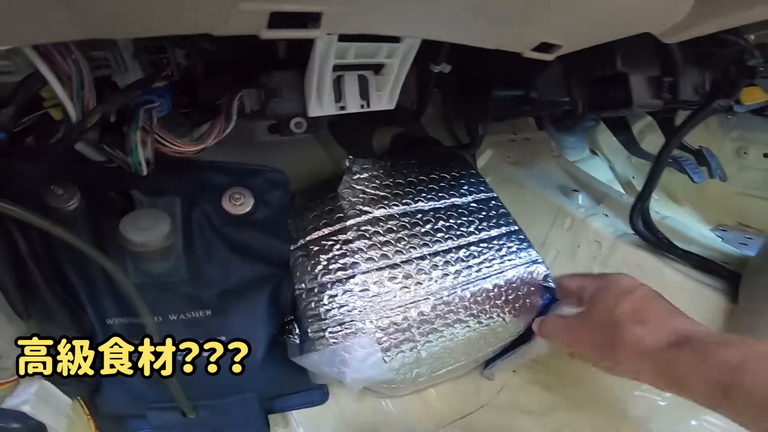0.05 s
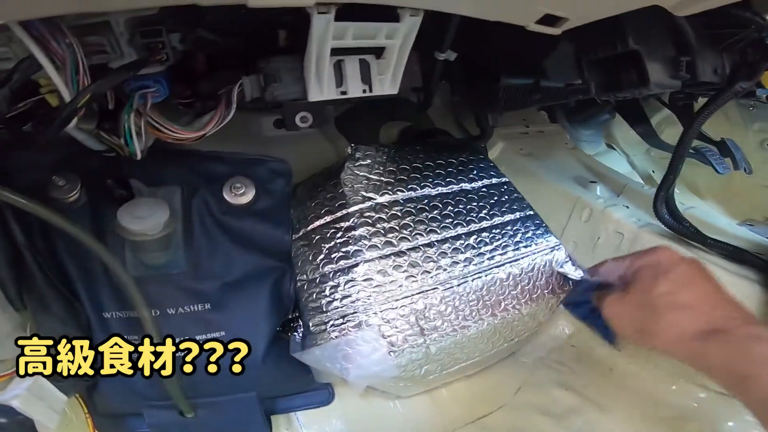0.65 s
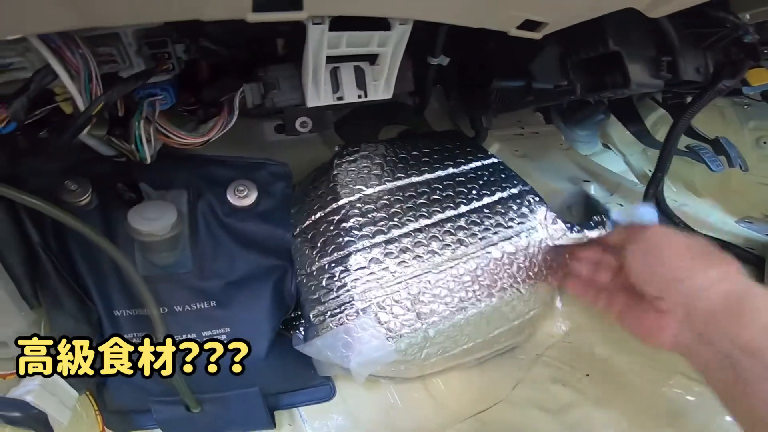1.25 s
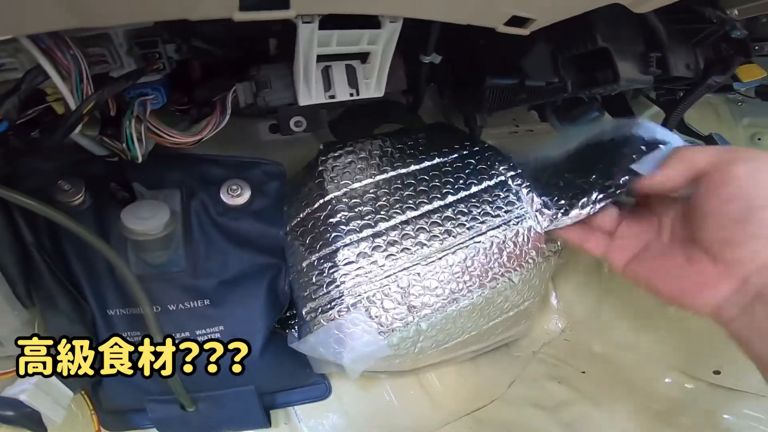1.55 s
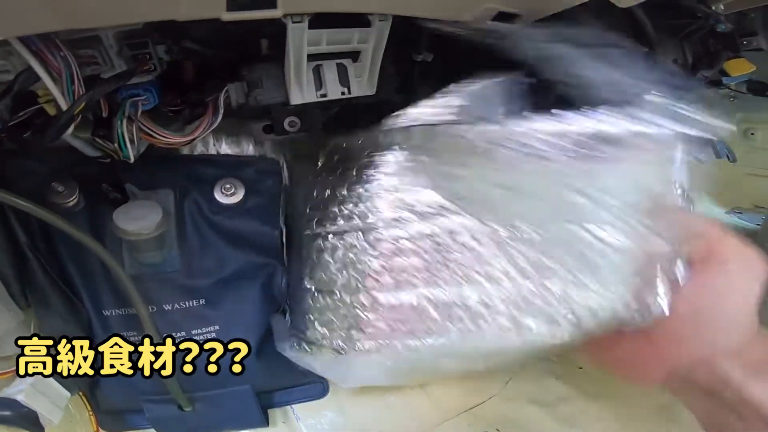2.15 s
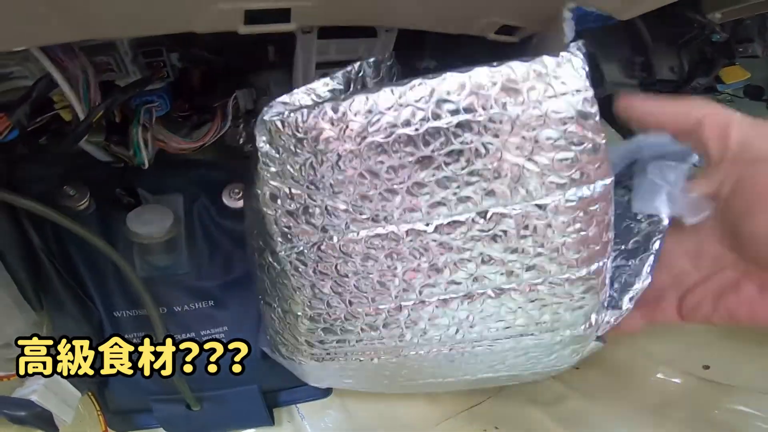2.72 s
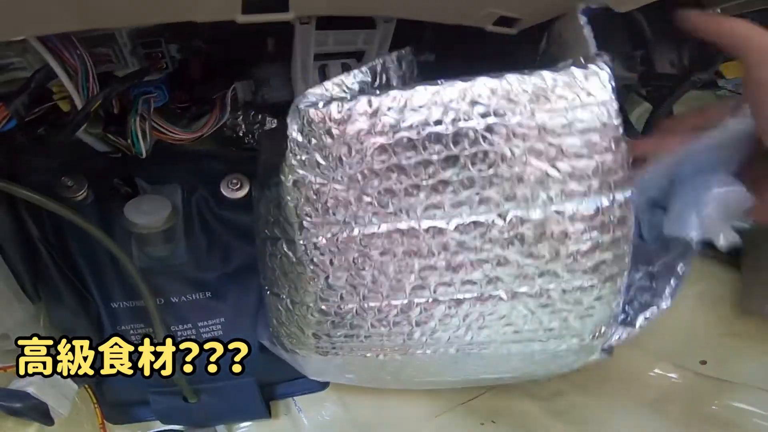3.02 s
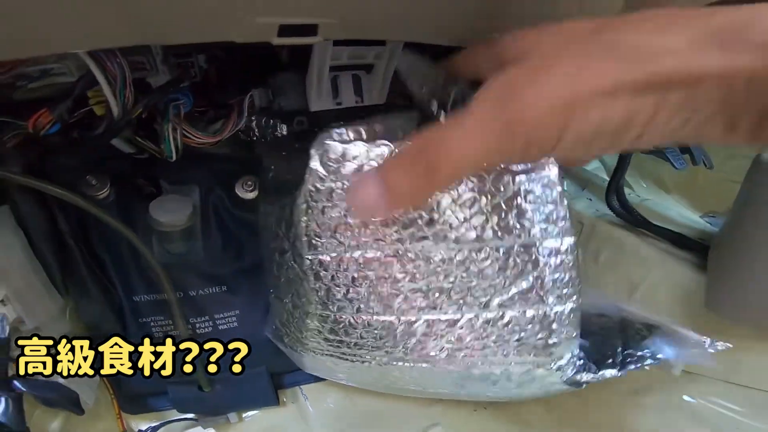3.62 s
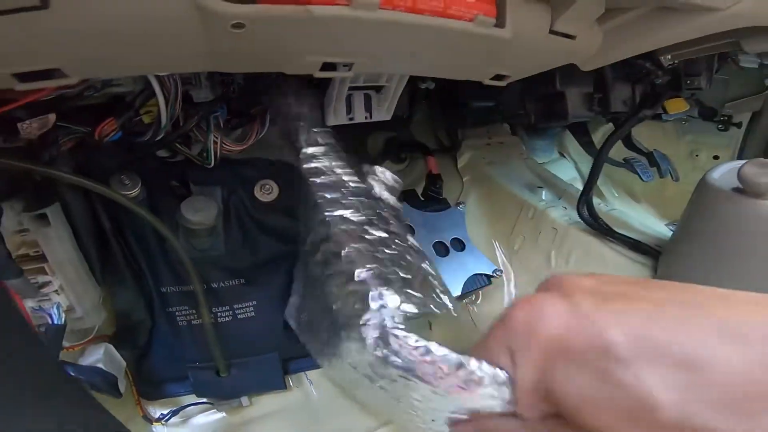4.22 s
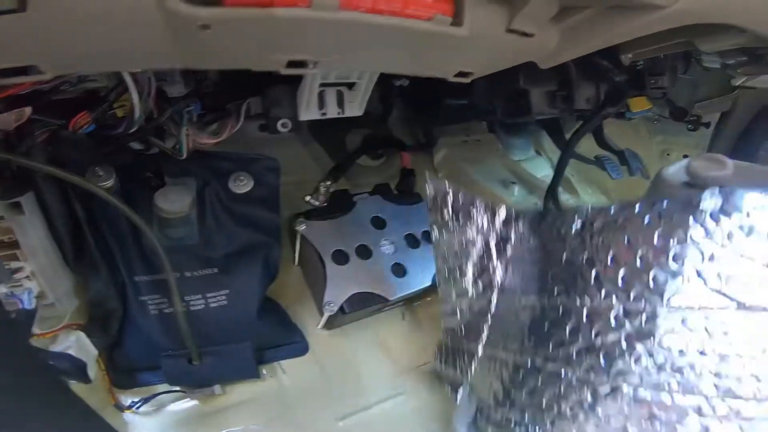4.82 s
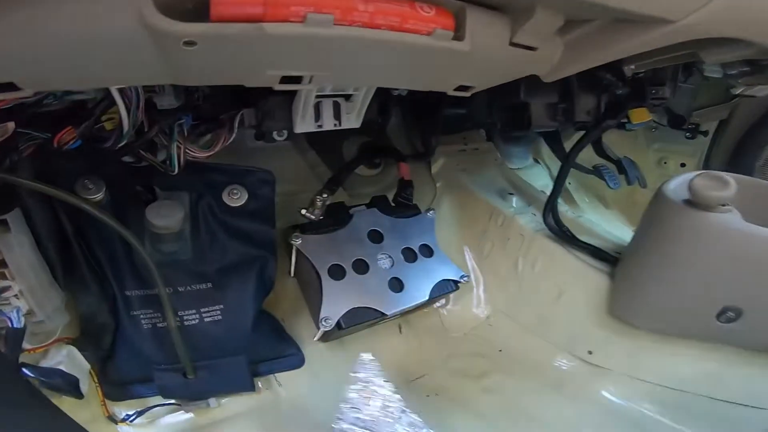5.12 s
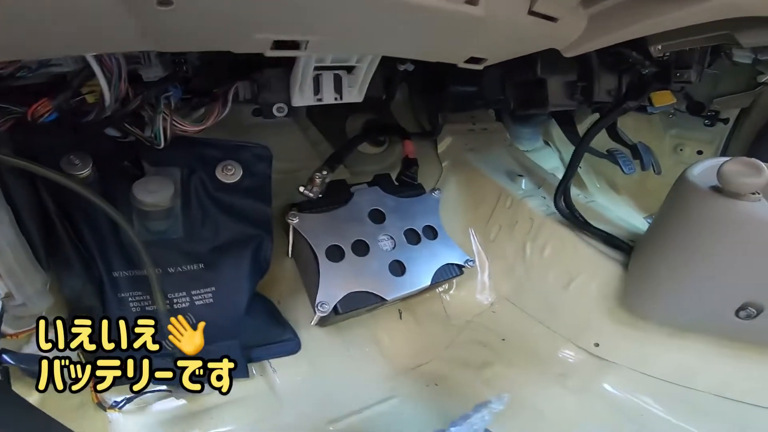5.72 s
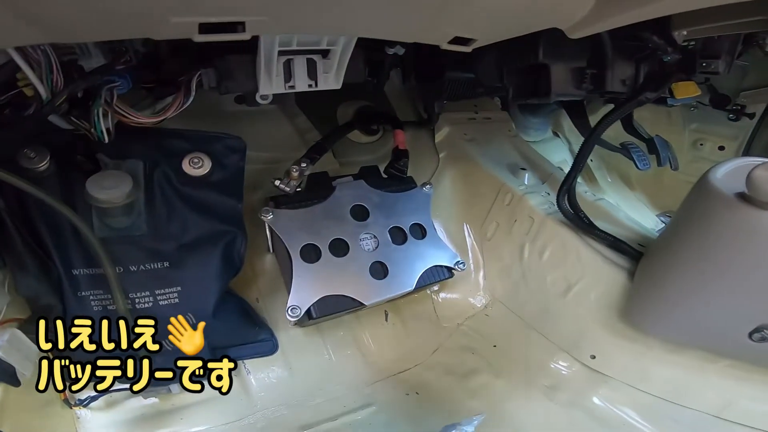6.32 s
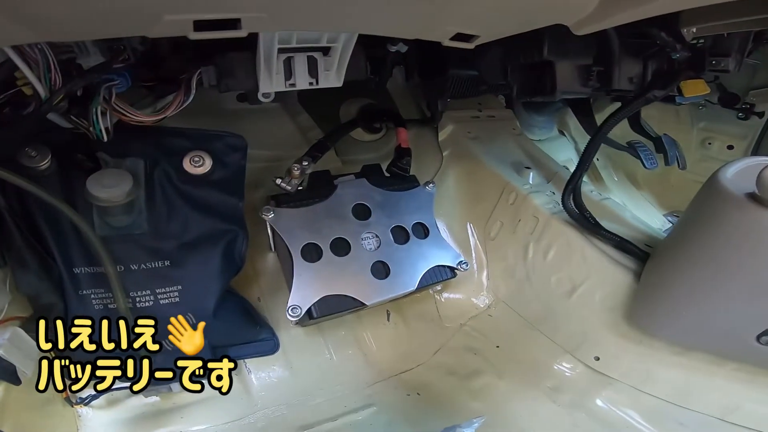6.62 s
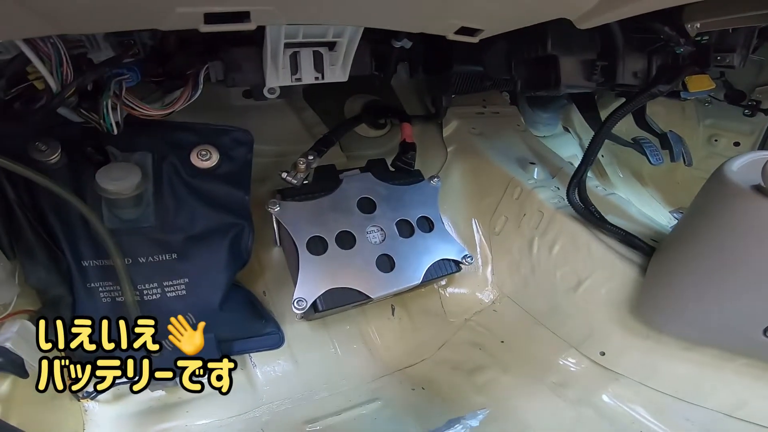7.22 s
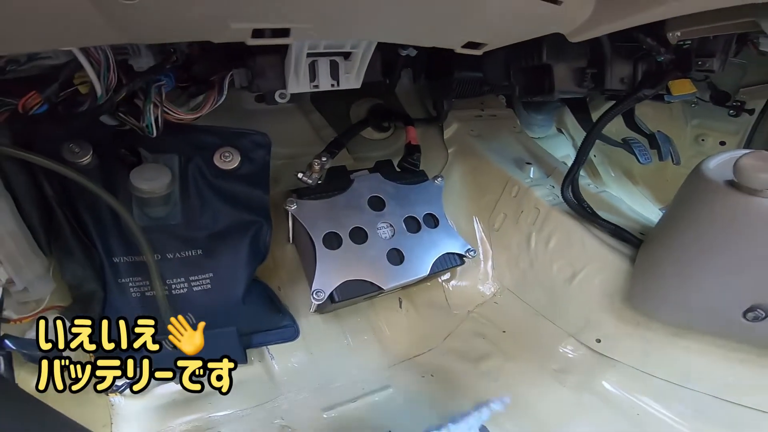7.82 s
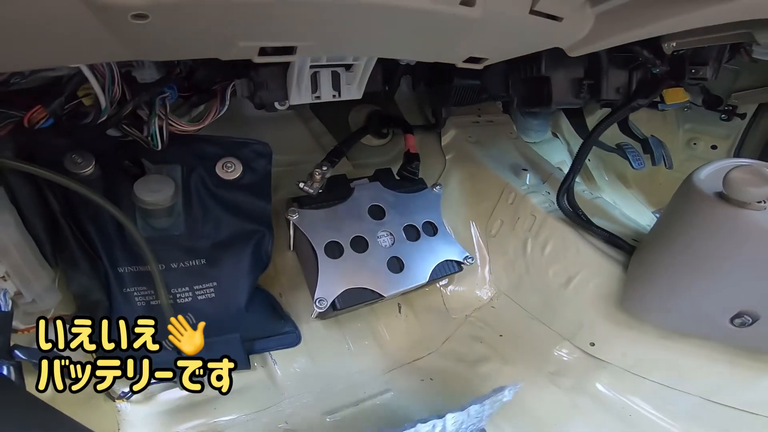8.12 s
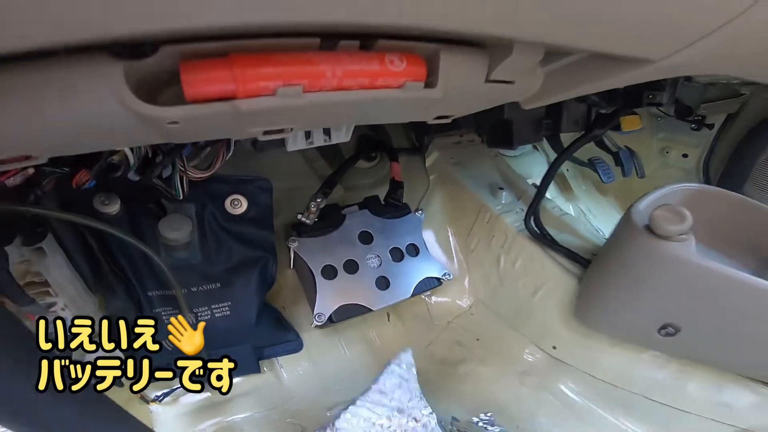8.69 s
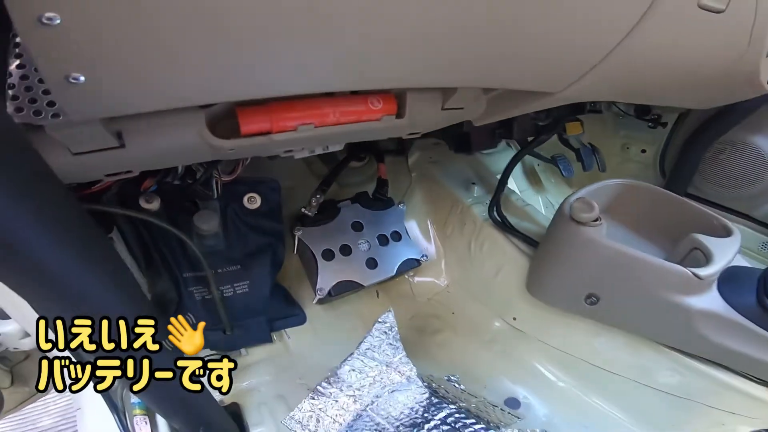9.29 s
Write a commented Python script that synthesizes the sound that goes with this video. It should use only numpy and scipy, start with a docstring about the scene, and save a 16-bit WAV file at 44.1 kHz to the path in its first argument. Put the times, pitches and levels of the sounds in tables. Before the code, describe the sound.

Close to the microphone in a small, damped car cabin, a sheet of foil bubble insulation crackles in uneven tugs for about six seconds. Larger creases pop and the flexing sheet gives low flaps and boxy thumps. It goes almost quiet as the sheet rests, then one more crinkling slide follows. Just before the end, a faint low engine idle comes in, slightly to the right.

```python
"""A car footwell, heard close up in stereo in the small, damped cabin.
Hands pull out a foil-faced bubble sheet, drag it aside, rest, and shift it again.
Countless tiny creases crackle, larger facets snap through, and the flexing sheet pushes the
cabin air and thuds as it buckles. Near the end an engine idles faintly in the background."""
import sys
import numpy as np
from scipy import signal
from scipy.fft import rfft, irfft, next_fast_len
from scipy.io import wavfile

SR = 44100
rng = np.random.default_rng(int(sys.argv[2]) if len(sys.argv) > 2 else 0)


def to_wav(sig):
    """Store sig (one row per channel, or 1-D mono) as 16-bit WAV at the path in sys.argv[1].

    Samples outside -1..1 are clipped; the rate is SR.
    """
    pcm = np.clip(np.atleast_2d(sig), -1, 1) * 32767
    pcm = np.round(pcm).astype(np.int16)
    wavfile.write(sys.argv[1], SR, pcm.T)  # frames by channels


N = 412335
T = np.arange(N) / SR
FFT_SIZE = next_fast_len(N)
BIN_HZ = np.maximum(np.arange(FFT_SIZE // 2 + 1) * SR / FFT_SIZE, 1)


def undb(db):
    """Decibels to gain."""
    return 10 ** (np.asarray(db) / 20)


def unit(x):
    """Scale to rms 1."""
    return x / np.sqrt(np.mean(x ** 2))


def decay(t, t60_s):
    """A fade that loses 60 dB in t60_s."""
    return np.exp(-np.log(1000) * t / t60_s)


def shaped(x, spectrum):
    """Colour x with rows of f/Hz, level/dB, at rms 1; nothing passes far above the last row."""
    hz, db = np.transpose(spectrum)
    gain = undb(np.interp(np.log(BIN_HZ), np.log(hz), db))
    gain /= 1 + (BIN_HZ / (2 * hz[-1])) ** 10
    return unit(irfft(rfft(x, FFT_SIZE) * gain, FFT_SIZE)[..., :N])


def panned(db):
    """Left and right gains of constant power; pan is left minus right in dB."""
    gains = undb(np.array([db, -db]) / 2)
    return gains / np.sqrt(np.mean(gains ** 2, axis=0))


def widen(mid, side, side_db):
    """Left and right from a mid and a side signal."""
    width = undb(side_db)
    return np.array([mid + width * side, mid - width * side]) / np.sqrt(1 + width ** 2)


def stereo_noise(side_db):
    """White noise, partly shared by left and right."""
    return widen(*rng.standard_normal((2, N)), side_db)


def wander(per_s):
    """A smooth random curve with a spread near 1."""
    steps = rng.standard_normal(4096)
    return np.interp(T * per_s, np.arange(len(steps)), steps)


# the idle coming in: t/s, level/dB
IDLE_LEVEL = [(8.82, -58), (8.92, -40), (9.0, -38.5), (9.08, -38.5), (9.35, -39)]
# engine hum: multiple of the firing rate, level/dB
FIRING_HARMONICS = [(1, -17), (2, -3.5), (3, -8.5), (4, -2), (5, -15), (6, -11.5), (8, -15.5), (9, -24.5),
                    (10, -14)]
# spectrum of the mechanical noise: f/Hz, level/dB
ENGINE_SPECTRUM = [(25, -4), (60, -1.5), (88, 8.5), (120, -3), (250, -8), (500, -11), (1000, -17.5),
                   (2500, -25), (5000, -32.5), (7000, -46), (9500, -78)]
def engine(firing_hz=38.54, waver=0.01, hum_db=-5, noise_db=-1.0, pan_db=-3.0):
    """In the background, a little to the right: unsteady firing harmonics over dull mechanical noise."""
    phase = 2 * np.pi * np.cumsum(firing_hz * (1 + waver * wander(23))) / SR
    hum = unit(sum(undb(db) * np.sin(k * phase + 2 * np.pi * rng.random())
                   for k, db in FIRING_HARMONICS))
    noise = shaped(stereo_noise(side_db=-1.0), ENGINE_SPECTRUM)
    level = undb(np.interp(T, *np.transpose(IDLE_LEVEL), left=-140))
    return level * (undb(hum_db) * hum + undb(noise_db) * noise) * panned(pan_db)[:, None]


def cabin(x, t60_s=0.043, wet_db=-15, gap_s=0.011):
    """Trim and carpet close to the microphone return a short, dense tail, different on each side."""
    t = np.arange(SR // 5) / SR
    tail = rng.standard_normal((2, len(t))) * decay(t, t60_s) * (t > gap_s)
    tail /= np.sqrt(np.sum(tail ** 2, axis=1, keepdims=True))
    return x + undb(wet_db) * signal.fftconvolve(x, tail, axes=1)[:, :N]


# faint brushes while the sheet rests: middle t/s, level/dB, half-length/s
SOFT_TOUCHES = [(6.064, -63, 0.037), (6.261, -63.5, .045), (6.38, -73, .072), (6.585, -58.5, .029),
                (6.687, -79, .064), (6.9, -71, .011), (7.149, -67.5, .027), (8.8, -53, 0.028),
                (8.903, -56.5, .04)]
def brushes(low_db=-1.5, bright_db=-3.5):
    """Soft touches come, hold briefly and stop."""
    touch = sum(undb(db) * np.exp(-((T - middle) / half_s) ** 4) for middle, db, half_s in SOFT_TOUCHES)
    power = (touch + 1e-9) ** 2
    return power, power * undb(low_db) ** 2, power * bright_db


# three moves (working loose, dragging aside, shifting again), each a list of: t/s, level/dB, pan/dB
SHEET_MOVES = [
    [(0, -41.5, -2), (.17, -47, -0.5), (.3, -50, -2), (.38, -42.5, -3), (.85, -37.5, -3), (1.25, -43, -2.5),
     (1.5, -36.5, -2), (1.85, -38, -1.5), (2.32, -33.5, -0.5), (2.45, -35.5, -3), (2.775, -38, 0.5)],
    [(2.79, -60.5, -1), (2.95, -42.5, -2), (3.15, -43, -1), (3.35, -40, -0.5), (3.62, -37, -1),
     (3.95, -33.5, -0.5), (4.4, -38.5, 0.5), (4.75, -41, -4), (5.73, -41, -4.5), (5.87, -49.5, -2),
     (6.01, -51, -2)],
    [(7.37, -53, -1), (7.43, -47.5, -1), (7.62, -48, -1), (7.77, -51.5, 0), (7.83, -42.5, -4.5),
     (8.0, -40.5, -3), (8.2, -33, -4), (8.45, -38, -4), (8.705, -44, -2)],
]
def sliding(reference_db=-42, flex_db=(-42, -42.5, -45.5), flex_slope=0.78, stop_db_per_s=850):
    """Each move rustles and flexes the sheet, least once it lies free; both stop with the hand."""
    rustle, low = 0, 0
    for move, move_flex_db in zip(SHEET_MOVES, flex_db):
        times, db, _ = np.transpose(move)
        level_db = np.interp(T, times, db)
        outside_s = np.abs(T - np.clip(T, times[0], times[-1]))
        moving = undb(-stop_db_per_s * np.minimum(outside_s, .5))
        rustle += (moving * undb(level_db)) ** 2
        low += (moving * undb(move_flex_db + flex_slope * (level_db - reference_db))) ** 2
    # faster sliding is brighter
    bright_db = -0.5 + 0.16 * np.clip(10 * np.log10(rustle) - reference_db, -10, 10)
    return rustle, low, rustle * bright_db


# pulls on the sheet: t/s, rise/s, length/s, crackle level/dB, flexing level/dB, brightness/dB
HAND_TUGS = [(0.007, .008, 0.02, -32, -50, -0.5), (0.215, .005, 0.0086, -30.5, -52, -4.5),
             (0.405, .012, 0.04, -29.5, -35.5, -1), (0.461, .008, 0.033, -29, -42, -3.5),
             (0.567, .03, 0.12, -34.5, -61, 1), (0.666, .015, .035, -29.5, -54, 0),
             (0.78, .005, 0.035, -40, -39, -2), (0.905, .008, .025, -36.5, -29.5, -2),
             (0.954, .008, .05, -29.5, -25.5, -5.5), (1.118, .005, 0.049, -36.5, -37, -6),
             (1.335, .02, 0.1, -34.5, -39, -2.5), (1.408, .022, 0.062, -25.5, -27.5, -5.5),
             (1.473, .01, 0.07, -33.5, -38, 0), (1.529, .02, 0.049, -26, -29, 3),
             (1.606, .015, 0.049, -36, -45, 5), (1.862, .06, 0.085, -27.5, -40, 2.5),
             (1.936, .025, 0.059, -23.5, -19.5, 1), (2.011, .01, 0.05, -27.5, -23, -1.5),
             (2.079, .01, 0.22, -30, -27.5, -2.5), (2.148, .005, 0.042, -29, -22.5, -2),
             (2.571, .005, 0.13, -32, -30, -2), (2.666, .015, 0.044, -23.5, -26.5, -4),
             (2.718, .008, 0.049, -36, -29.5, 6.5), (2.942, .03, 0.12, -34, -38.5, 3),
             (3.185, .08, 0.17, -33, -29, 0), (3.49, .03, 0.056, -37.5, -42, 4),
             (3.674, .04, 0.083, -35.5, -35, 3), (3.786, .005, 0.037, -32, -30, 3.5),
             (3.992, .025, 0.065, -28, -31, 4.5), (4.105, .006, .09, -35.5, -39, 4),
             (4.187, .03, 0.053, -29, -41, 4.5), (4.253, .004, 0.013, -31.5, -27, -3),
             (4.294, .005, 0.021, -23.5, -20, -8), (4.491, .045, 0.092, -24, -23, -6.5),
             (4.636, .01, 0.052, -35.5, -40, 11.5), (4.758, .01, 0.17, -43, -52, 4.5),
             (4.933, .025, 0.1, -37, -41.5, 5), (5.033, .012, 0.055, -27, -33.5, 0.5),
             (5.097, .005, 0.048, -32.5, -25, 0.5), (5.168, .004, .07, -30.5, -34.5, -1),
             (5.248, .01, .11, -35, -39, -0.5), (5.363, .005, 0.067, -28, -31, -3.5),
             (5.618, .006, .065, -32.5, -44, 2), (5.925, .025, 0.084, -49, -54, -3.5),
             (7.838, .04, 0.078, -39, -62, 3), (8.217, .07, 0.084, -27.5, -51, -1.5),
             (8.464, .018, 0.058, -26, -41, -2)]
def tugs(release_s=0.011, sag_db_per_s=9):
    """A tug crumples the sheet: the force rises, sags and lets go."""
    power, low, bright = np.zeros((3, N))
    for start, rise, length, db, low_db, bright_db in HAND_TUGS:
        span = slice(int(start * SR), int((start + length) * SR) + SR // 5)
        t = T[span] - start
        pull = np.clip(t / rise, 0, 1) * undb(-sag_db_per_s * t)
        pull *= np.exp(-np.maximum(t - length, 0) / release_s)
        crumple = (undb(db) * pull) ** 2
        power[span] += crumple
        low[span] += (undb(low_db) * pull) ** 2
        bright[span] += crumple * bright_db
    return power, low, bright


def handling():
    """The hands' gestures add up to crackle level, flexing level and brightness, all in dB."""
    # each gives crackle power, flexing power and brightness weighted by crackle power
    power, low, bright = np.sum([brushes(), sliding(), tugs()], axis=0)
    return 10 * np.log10(power), 10 * np.log10(low), bright / power


def creases(per_s, spread_db, side_db):
    """Tiny creases give way at random, mostly weak; each radiates its own way to left and right."""
    gives_way = rng.random(N) < per_s / SR
    strength = np.minimum(rng.exponential(size=N), 4)
    ticks = gives_way * undb(spread_db * strength)
    return unit(ticks * stereo_noise(side_db))


# spectrum of hard flexing, which rings the footwell: f/Hz, level/dB
FLAP_SPECTRUM = [(20, -15), (35, -8), (52, -6.5), (68, -7.5), (86, 1.5), (112, -5.5), (150, -6.5),
                 (250, -6), (350, -16), (600, -27.5), (1100, -46.5)]
# spectrum of gentle sliding over the floor: f/Hz, level/dB
FLOOR_SPECTRUM = [(20, -10.5), (35, -9), (52, -3), (100, -1.5), (170, -2), (270, -3.5), (380, -8.5),
                  (600, -13.5), (1100, -40)]
def flexing(low_db, gentle_db=-46, hard_db=-27):
    """Down on the floor, gentle moves only slide; harder ones flap broad panels that push the air."""
    effort = np.clip((low_db - gentle_db) / (hard_db - gentle_db), 0, 1)
    flap = shaped(creases(per_s=1400, spread_db=1.0, side_db=-12), FLAP_SPECTRUM)
    slide = shaped(stereo_noise(side_db=-7.5), FLOOR_SPECTRUM)
    return undb(low_db) * (np.sqrt(effort) * flap + np.sqrt(1 - effort) * slide)


# the whole sheet buckling: t/s, thud level/dB, f/Hz, t60/s, knock level/dB
SHEET_BUCKLES = [(.8205, -17.5, 107, 0.083, -25.5), (0.914, -20.5, 105, 0.099, -33.5),
                 (0.9651, -7.5, 111, 0.089, -21.5), (1.9733, -4.5, 148, 0.05, -13.5),
                 (2.03, -6.5, 197, 0.036, -18.5), (2.1488, -1.5, 161, 0.036, -20),
                 (2.163, -17, 70, 0.056, -32.5), (2.727, -17, 87.3, 0.16, -21),
                 (4.1051, -5.5, 199, 0.043, -19), (4.308, -20, 105, 0.12, -35),
                 (4.517, -14, 87, 0.17, -28.5), (5.107, -20.5, 119, 0.05, -18.5)]
# spectrum of the panels' boxy knock: f/Hz, level/dB
KNOCK_SPECTRUM = [(120, -16), (280, 5), (420, -4.5), (620, -2), (850, -11.5), (1400, -28.5)]
def buckles(boom_hz=86, boom_t60_s=0.14, boom_db=-16, rise_s=0.002, knock_t60_s=0.091):
    """Dead centre, the bubble layer thuds, its panels knock, and a short boom stays in the footwell."""
    t = np.arange(SR // 4) / SR
    panels = shaped(stereo_noise(side_db=-9.0), KNOCK_SPECTRUM)
    boom = undb(boom_db) * np.sin(2 * np.pi * boom_hz * t) * decay(t, boom_t60_s)
    onset = 1 - np.exp(-t / rise_s)
    out = np.zeros((2, N))
    for start, db, pitch_hz, t60_s, knock_db in SHEET_BUCKLES:
        span = slice(int(start * SR), int(start * SR) + len(t))
        thud = np.sin(2 * np.pi * pitch_hz * t) * decay(t, t60_s)
        knock = panels[:, span] * decay(t, knock_t60_s)
        out[:, span] += (undb(db) * (thud + boom) + undb(knock_db) * knock) * onset
    return out


def small_facets(level_db, per_s=8, gentle_db=-48, firm_db=-36, pitch_hz=1400, q=.4, length_s=0.0023):
    """Rows for snaps(): smaller facets go at random, more often and harder under a firmer hand."""
    slots = 400
    when, chance = rng.random((slots, 2)).T
    strength, octaves, side = np.clip(rng.standard_normal((slots, 3)), -1.8, 1.8).T
    at = ((np.arange(slots) + when) / slots * N).astype(int)
    effort = np.clip((level_db[at] - gentle_db) / (firm_db - gentle_db), 0, 1)
    snapping = np.flatnonzero(chance < effort * per_s * T[-1] / slots)
    db = level_db[at] + 6.0 + 2.5 * strength
    hz = pitch_hz * 2 ** (0.96 * octaves)
    pan_db = -2.0 + 4.0 * side
    return [(T[at[k]], db[k], hz[k], q, length_s, pan_db[k]) for k in snapping]


# large foil facets snapping through: t/s, level/dB, f/Hz, sharpness Q, length/s, pan/dB
LARGE_FACETS = [(.1195, -33.5, 3370, 0.078, 0.0059, -2), (.2226, -25.5, 860, 0.27, 0.0054, -4),
                (.298, -38.5, 1400, 0.13, .0023, -1), (.417, -20.5, 2880, 2.5, 0.0044, -6),
                (.4967, -15.5, 2770, 2.2, 0.0013, -0.5), (.6374, -22, 1220, 1.4, 0.0021, 0),
                (.6828, -23.5, 1690, .37, 0.0026, 1), (.7787, -19.5, 680, 0.2, 0.0054, -1),
                (.819, -16, 709, 0.18, 0.0037, 2.5), (.955, -18, 1430, 5.1, 0.0092, 0),
                (.966, -16, 580, 0.29, .0029, -3), (1.127, -25.5, 1570, 0.15, 0.0034, -2),
                (1.171, -29.5, 1510, 0.57, .0035, -2), (1.298, -28, 990, .19, 0.0063, -3.5),
                (1.3664, -22.5, 1630, 0.31, 0.0054, -2.5), (1.4315, -18.5, 580, .2, 0.0079, -3.5),
                (1.548, -24.5, 1690, 0.11, 0.0025, -6), (1.716, -26.5, 600, 0.19, 0.0024, -3),
                (1.8349, -22, 3180, 1.9, .0028, -1), (1.872, -27, 2300, .3, 0.003, -1),
                (1.9778, -24.5, 440, 1.3, 0.0047, 2.5), (2.0317, -18.5, 620, 2.7, 0.0077, 0.5),
                (2.1, -22.5, 394, 0.71, 0.0042, 1), (2.1249, -19, 2400, 0.99, 0.011, 2),
                (2.15, -11.5, 660, 0.29, 0.004, -1.5), (2.364, -25.5, 1500, 0.52, .0023, -4),
                (2.4751, -22, 710, 0.15, 0.0039, -2), (2.571, -19, 500, 0.17, 0.0047, -4),
                (2.6665, -20.5, 1070, 0.37, 0.0032, -1), (2.6827, -15.5, 503, 0.22, 0.0058, -15),
                (2.7317, -21, 480, 0.2, 0.006, 2), (2.945, -25.5, 4670, 0.43, 0.0028, -2),
                (3.2083, -25.5, 447, 0.49, 0.0033, -6), (3.472, -26.5, 1120, 0.75, 0.0034, 4),
                (3.5229, -25, 4380, 0.18, 0.003, -1), (3.744, -20.5, 1070, .28, 0.0056, 2.5),
                (3.792, -23, 1160, 0.078, 0.0022, 2), (4.055, -22, 790, 0.22, .0047, 0),
                (4.107, -18, 705, 0.18, 0.0049, -4), (4.2585, -15.5, 950, .35, 0.0056, 1.5),
                (4.301, -19.5, 1500, .9, 0.0081, 0), (4.3688, -28, 1110, 0.52, .0029, -1),
                (4.4125, -23.5, 1480, 0.54, 0.0023, -1), (4.498, -23.5, 2810, 0.12, .0024, 1),
                (4.5426, -18, 1030, 1.7, 0.0036, -15), (4.7004, -29.5, 670, 1, 0.0026, -10),
                (5.1035, -12, 1520, 1.4, 0.0031, -2.5), (5.173, -17.5, 1100, .6, 0.0038, -6),
                (5.2463, -24.5, 850, 0.9, 0.0082, -5), (5.275, -29.5, 1850, 4.7, .005, -10),
                (5.2988, -14.5, 750, 1.5, 0.0049, -9), (5.527, -26, 2480, 0.039, 0.0045, -7),
                (5.7156, -22.5, 1030, 0.47, 0.0047, -6), (6.2153, -43.5, 4530, 0.38, 0.0043, -4),
                (7.051, -68, 3600, .3, 0.0026, -1), (7.648, -33.5, 2140, .1, 0.0037, -2),
                (7.8275, -29, 1090, .68, 0.0012, -5), (8.015, -31, 1250, 1.3, 0.0048, -5),
                (8.089, -25, 1690, 0.21, 0.0081, -4), (8.1355, -27, 1970, 0.083, .0043, -4),
                (8.184, -22.5, 1140, 0.64, 0.0057, -2), (8.217, -18.5, 1280, 0.54, 0.0024, -2),
                (8.367, -23, 1290, 0.32, 0.0019, -2), (8.3972, -22, 3060, 3.4, 0.0015, -3),
                (8.9326, -39, 560, .11, 0.0026, -1), (9.2252, -42.5, 480, 0.047, 0.0057, -3)]
def snaps(level_db, edge_hz=6300, crack_db=-25, overtone=2.3, overtone_db=-12,
          ring_db=-18, ring_s=0.0048, trim_db=-0.5):
    """Close by, a facet snaps: bending waves at a pitch and an overtone, a weak crack, a brief ring."""
    size = 2048
    t = (np.arange(size) - size // 2) / SR
    hz = np.maximum(np.arange(size // 2 + 1) * SR / size, 1)
    treble_cut = 1 / np.sqrt(1 + (hz / edge_hz) ** 18)
    ring = undb(ring_db) * (t > 0) * np.exp(-np.abs(t) / ring_s)
    out = np.zeros((2, N + 2 * size))
    for when, db, pitch_hz, q, length_s, pan_db in list(LARGE_FACETS) + small_facets(level_db):
        window = np.maximum(np.exp(-np.abs(2 * t / length_s) ** 3), ring)
        waves = rfft(rng.standard_normal((2, size)) * window)
        waves /= np.sqrt(np.abs(waves) + 1e-9)  # evens out chance peaks
        first, second = (1 / (1 + (q * (hz / f - f / hz)) ** 2) for f in (pitch_hz, overtone * pitch_hz))
        response = np.sqrt(first ** 2 + (undb(overtone_db) * second) ** 2 + undb(crack_db) ** 2)
        burst = irfft(waves * response * treble_cut)
        burst /= np.sqrt(np.sum(burst ** 2, axis=1, keepdims=True) / (.004 * SR))  # as 4 ms at rms 1
        i = int(when * SR)
        out[:, i:i + size] += undb(db + trim_db) * widen(*burst, side_db=-9.0) * panned(pan_db)[:, None]
    return out[:, size // 2:size // 2 + N]


def avalanches(per_s=130, fade_s=0.019, depth=0.38):
    """One crease sets off its neighbours: the crackling jumps up at once and dies away."""
    starts = (rng.random(N) < per_s / SR) * np.minimum(rng.exponential(size=N), 3)
    surges = signal.lfilter([1], [1, -np.exp(-1 / (fade_s * SR))], starts)
    return unit(1 + depth * surges)


# spectrum of the crackling foil face: f/Hz, level/dB
FOIL_SPECTRUM = [(250, -1.5), (450, 0), (700, 2), (1200, 0), (1900, -2.5), (2800, -1), (4000, -3),
                 (5300, -3), (6900, -12), (8000, -24), (9000, -30.5), (10000, -58.5)]
def crackle(bright_db, flicker_db=1.5, tilt=0.46, pivot_hz=2300, band_octaves=.6):
    """Close to the microphone, creases tick over the hiss of sliding foil; each band flickers."""
    foil = creases(per_s=8000, spread_db=1.5, side_db=-3.0) + stereo_noise(side_db=-11.5)
    spectrum = rfft(shaped(foil, FOIL_SPECTRUM), FFT_SIZE)
    out, power = 0, 0
    for centre in np.arange(8, 13.6, band_octaves):  # octaves above 1 Hz
        share = np.maximum(1 - np.abs(np.log2(BIN_HZ) - centre) / band_octaves, 0)
        band = irfft(spectrum * share, FFT_SIZE)[:, :N]
        # tight folds favour the treble, loose ones the middle
        above_pivot = np.clip(centre - np.log2(pivot_hz), -1.6, 1.1)
        gain = undb(tilt * bright_db * above_pivot + flicker_db * wander(55))
        out += band * gain
        power += np.mean(band ** 2) * gain ** 2
    return unit(out / np.sqrt(power) * avalanches())


def scene(crackle_db=0.81, flex_db=0.05, bumpy_db=0.7, bumps_per_s=32, hiss_db=-108):
    """At the microphone: the sheet close up and mostly a little right, the engine, a trace of hiss."""
    level_db, low_db, bright_db = handling()
    times, _, move_pan_db = np.concatenate(SHEET_MOVES).T
    pan_db = np.interp(T, times, move_pan_db)
    foil = crackle(bright_db) * undb(level_db + crackle_db) * panned(pan_db)
    foil += snaps(level_db)
    body = flexing(low_db + flex_db + bumpy_db * wander(bumps_per_s)) * panned(0.39 * pan_db)
    body += buckles()
    return cabin(foil) + body + engine() + undb(hiss_db) * rng.standard_normal((2, N))


def record(dry, ceiling=.8, top_hz=10000):
    """The camera's microphone clips the very highest peaks and cuts the top."""
    lowpass = signal.ellip(8, .2, 70, top_hz, fs=SR, output="sos")
    return signal.sosfilt(lowpass, np.clip(dry, -ceiling, ceiling))


dry = scene()
out = record(dry)
to_wav(out)
```